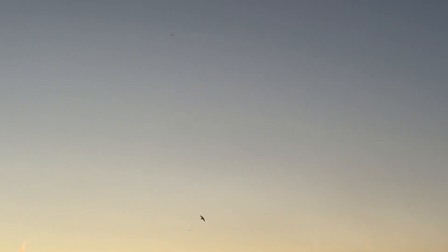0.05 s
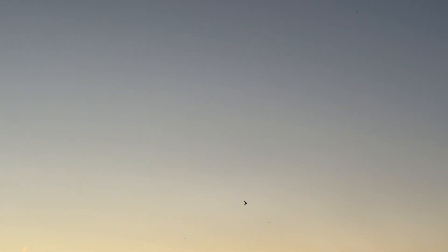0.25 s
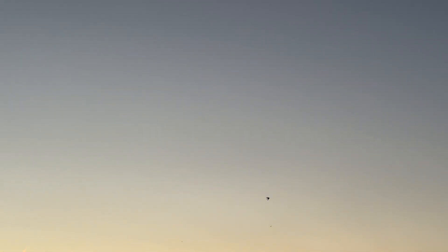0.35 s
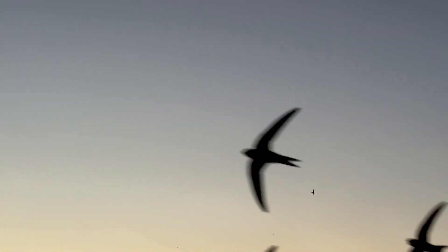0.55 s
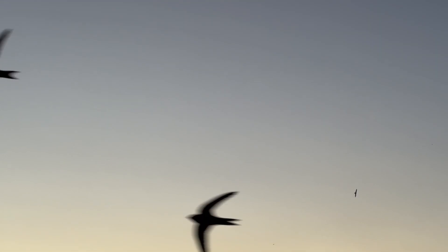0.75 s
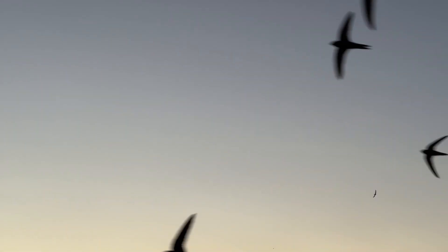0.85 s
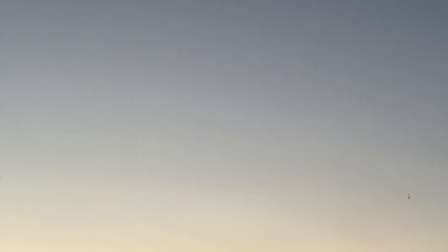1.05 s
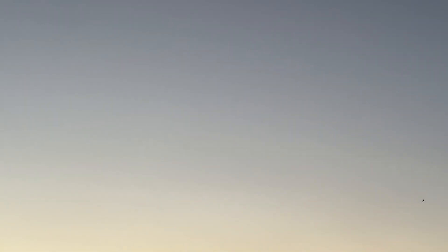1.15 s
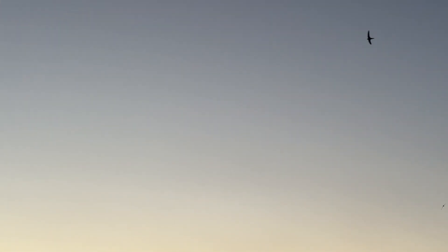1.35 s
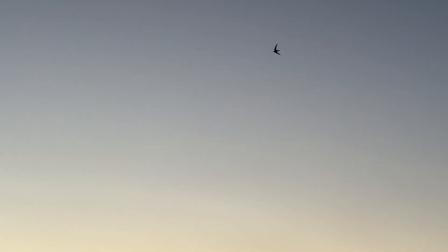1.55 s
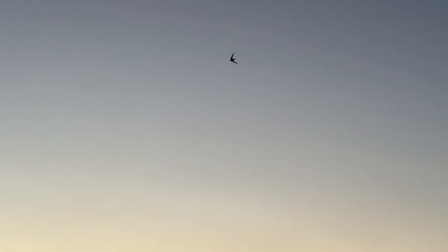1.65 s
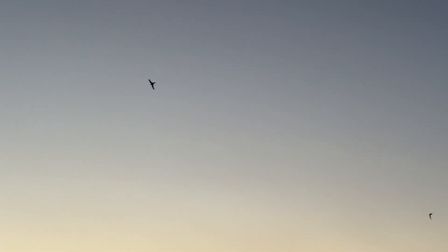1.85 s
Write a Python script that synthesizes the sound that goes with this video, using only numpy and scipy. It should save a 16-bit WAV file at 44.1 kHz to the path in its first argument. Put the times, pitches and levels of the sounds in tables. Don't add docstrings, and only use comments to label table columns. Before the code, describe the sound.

Swifts scream shrilly as a flock sweeps close overhead, then fades to thin distant calls

```python
import sys
import numpy as np
from scipy import signal
from scipy.fft import rfft, irfft
from scipy.io import wavfile

SR = 44100
rng = np.random.default_rng(int(sys.argv[2]) if len(sys.argv) > 2 else 0)


def store_wav(level_fs):
    pcm = np.round(np.clip(np.atleast_2d(level_fs), -1, 1) * 32767)
    wavfile.write(sys.argv[1], SR, pcm.T.astype(np.int16))


def boost(x):
    u = np.asarray(x, float) / 20
    return 10 ** u


N = 83790

# (multiple of the pitch, level [dB], hoarseness [0-1])
VOICE_PARTIALS = [(.5, -43, .5), (1, 0, .06), (1.5, -19, .45), (2, -15.5, .33), (2.5, -25, .5)]


def rms_one(x):
    return x / np.sqrt(np.mean(x ** 2) + 1e-20)


def drift(rate_hz, size):
    settle = 2000
    r = np.exp(-2 * np.pi * rate_hz / SR)
    gain = 2 * (1 - r) ** 1.5 / np.sqrt(r + 1)
    noise = rng.standard_normal(size + settle)
    return np.sqrt(2) * signal.lfilter([gain], [1, -2 * r, r * r], noise)[settle:]


def filtered(x, order, hz, kind="low"):
    return signal.sosfilt(signal.butter(order, hz, kind, fs=SR, output="sos"), x)


def add(out, start_s, sound):
    i = int(start_s * SR)
    a, b = max(i, 0), min(i + len(sound), N)
    if b > a:
        out[a:b] += sound[a - i:b - i]


def voice(hz, db, partials, buzz=0):
    breath_db, buzz_breath_db, breath_low_hz = -39, 11, 6800
    hoarse_hz, buzz_hoarseness = 550, 1.3
    n = len(hz)
    phase = 2 * np.pi * np.cumsum(hz) / SR
    breath = filtered(rng.standard_normal(n), 2, breath_low_hz, "high")
    out = boost(breath_db + buzz_breath_db * buzz) * breath
    for multiple, partial_db, hoarse in partials:
        h = np.clip(hoarse * (1 + buzz_hoarseness * buzz), 0, 1)
        smear = 1 - h + h * drift(hoarse_hz, n)
        below_limit = multiple * hz < .45 * SR
        out = out + boost(partial_db) * smear * np.sin(multiple * phase) * below_limit
    return np.sqrt(2) * boost(db) * out


def scream(hz, db, buzz):
    buzz_hz, buzz_jitter, buzz_fall_hz = 268, .07, 1000
    wobble_hz, flutter_db, edge_s = 22, 1.8, .004
    n, buzz = len(hz), np.clip(buzz, 0, 1)
    cycle = np.cumsum(buzz_hz * (1 + buzz_jitter * drift(25, n)) / SR) % 1
    hz = hz + wobble_hz * drift(57.4, n) + buzz * buzz_fall_hz * (.5 - cycle)
    chop = 1 - buzz + buzz * 2.7 * np.sin(np.pi * cycle) ** 2
    t = np.arange(n) / SR
    edge = np.clip(np.minimum(t, t[-1] - t) / edge_s, 0, 1)
    return edge * chop * voice(hz, db + flutter_db * drift(44, n), VOICE_PARTIALS, buzz)


def swoop(length_s, first_hz, top_hz, db):
    fast_rise_s, slow_rise_s, fast_share = .015, .09, .62
    swell_db, release_s, late_buzz = 4.5, .03, .45
    t = np.arange(int(length_s * SR)) / SR
    left_to_rise = fast_share * np.exp(-t / fast_rise_s) + (1 - fast_share) * np.exp(-t / slow_rise_s)
    release = np.clip(1 - (length_s - t) / release_s, 0, 1)
    level = db - swell_db * left_to_rise - 15 * release
    return scream(top_hz - (top_hz - first_hz) * left_to_rise, level, late_buzz * t / length_s)


def chip(length_s, hz, fall_hz, db, partials):
    u = np.linspace(0, 1, int(length_s * SR))
    return np.sin(np.pi * u) ** 2 * voice(hz + fall_hz * (.5 - u), db, partials)


def screams():
    # (time [s], pitch [Hz], level [dB], buzz [0-1])
    leads = [
        [(.201, 4950, -42.5, 0.27), (.22, 6005, -30.5, 0.05), (.246, 6517, -26, 0.33), (.3, 6870, -23.5, 0.06),
         (.355, 7083, -25.5, 0.58), (.4, 7316, -26.5, 0.71), (.45, 6944, -21.5, 0.4), (.5, 6737, -24.5, 0),
         (.53, 6370, -32.5, 0.9)],
        [(.474, 4520, -42, 0), (.49, 4953, -49, 0.9), (.512, 5350, -29.5, 0), (.536, 6050, -18, 0.1),
         (.57, 6190, -19, 0), (.61, 6246, -20.5, 0.08), (.65, 6210, -25.5, 0), (.72, 6141, -23, 0.2),
         (.8, 6070, -26, 0)],
        [(.79, 6108, -30, 0.41), (.803, 6180, -20, 0.7), (.815, 6203, -27, 1), (.83, 6177, -26, 0.6),
         (.86, 6160, -21, 0.42), (.886, 6280, -27.5, 0.98), (.895, 5830, -68, 1)],
    ]
    # (time [s], pitch [Hz], level [dB], buzz [0-1])
    stragglers = [
        [(1.073, 4980, -68, 0.4), (1.082, 4925, -36.5, 0.2), (1.107, 5480, -39.5, 0.53), (1.14, 5847, -37, 0),
         (1.19, 5960, -41, 0), (1.25, 5906, -39.5, 0.1), (1.3, 6100, -46.5, 0), (1.345, 5705, -59, 0.2)],
        [(1.133, 4110, -45, 0.2), (1.147, 4390, -42, 0), (1.163, 5060, -34.5, 0.1), (1.183, 4860, -41, 0),
         (1.2, 5210, -39, 0), (1.25, 5430, -38, 0), (1.33, 5483, -50, 0.55), (1.42, 5304, -54.5, 0.16),
         (1.465, 5400, -46, 0.05)],
        [(1.638, 4510, -53, 0.1), (1.67, 4780, -50.5, 0.05), (1.7, 5210, -56, 0.3), (1.735, 5456, -46.5, 0.13),
         (1.79, 5620, -53, 0), (1.9, 5730, -58, 0.35)],
    ]
    # (start [s], length [s], first pitch [Hz], top pitch [Hz], level [dB])
    swoops = [(0.016, 0.17, 4580, 6300, -41), (0.084, 0.14, 5840, 6580, -34.5),
              (0.13, 0.14, 4660, 6600, -42), (0.219, 0.35, 4550, 6440, -30), (0.29, 0.238, 6450, 6900, -29),
              (0.14, 0.13, 6300, 6800, -37.5), (0.61, 0.037, 5170, 6100, -31),
              (0.567, 0.12, 5600, 6300, -19), (0.588, 0.16, 4400, 6200, -33.5),
              (0.64, 0.18, 5200, 5950, -29), (0.774, 0.094, 4800, 6250, -26),
              (0.834, 0.18, 4950, 5800, -34), (0.45, 0.028, 5300, 5750, -27),
              (1.027, 0.04, 5100, 5000, -45.5), (1.03, 0.08, 3940, 4700, -50.5),
              (1.566, 0.044, 4430, 5200, -52), (1.895, 0.022, 4520, 5200, -41),
              (1.35, 0.14, 5370, 5390, -54), (1.47, 0.11, 5350, 5310, -51.5),
              (1.34, 0.16, 5700, 6150, -53.5)]
    out = np.zeros(N)
    for track in leads + stragglers:
        s, *columns = np.transpose(track)
        t = np.arange(s[0], s[-1], 1 / SR)
        add(out, s[0], scream(*[np.interp(t, s, c) for c in columns]))
    for s, *shape in swoops:
        add(out, s, swoop(*shape))
    return out


def throbs():
    # (middle [s], length [s], pitch [Hz], level [dB])
    pulses = [(.562, .012, 6290, -18.5), (.64, .012, 6334, -16), (.664, .013, 6200, -13),
              (.684, .022, 6244, -16), (.7, 0.016, 6110, -14.5), (.713, 0.012, 6123, -15),
              (.725, .012, 6008, -22), (.745, .024, 6116, -16.5), (.762, .012, 6195, -18.5),
              (.771, 0.014, 6100, -19.5), (.783, .014, 6000, -17)]
    rise_hz = 100
    out = np.zeros(N)
    for s, length, hz, db in pulses:
        add(out, s - length / 2, chip(length, hz, -rise_hz, db, VOICE_PARTIALS))
    return out


def trills():
    # (start [s], gap [s], first pitch [Hz], drop per chip [Hz], first level [dB])
    rows = [
        (.01, .0262, 6500, 30, -37),
        (.411, .027, 6050, 40, -32),
        (.563, .0255, 6500, 20, -23),
        (.9055, .0288, 6130, 90, -19),
    ]
    # (multiple of the pitch, level [dB], hoarseness [0-1])
    trill_partials = [(1, 0, .05), (1.5, -15, .5), (2, -11, .3), (2.5, -22, .5)]
    fade_db, chip_s, rise_hz = 2.5, .01, 250
    out = np.zeros(N)
    for s, gap, hz, drop, db in rows:
        for k in range(5):
            note = chip(chip_s, hz - k * drop, -rise_hz, db - k * fade_db, trill_partials)
            add(out, s + k * gap - chip_s / 2, note)
    return out


def rasping_bird():
    # (start [s], pulses, middle pitch [Hz], level [dB])
    bursts = [
        (0.7324, 4, 4800, -29),
        (0.752, 1, 4720, -31),
        (0.7642, 1, 4950, -27.5),
        (0.774, 1, 4760, -31),
        (0.7847, 4, 4740, -30),
        (0.831, 5, 4626, -31.5),
        (0.856, 1, 4500, -37),
        (0.864, 1, 4360, -36),
        (0.888, 1, 4570, -37),
        (.896, 1, 4170, -35.5),
    ]
    # (middle [s], middle pitch [Hz], fall
    # [Hz], level [dB])
    single_chips = [(.65, 5300, 600, -29), (.666, 4620, 200, -39), (.692, 5200, 600, -36),
                    (.722, 3950, 300, -40), (.905, 4300, 1500, -38), (.915, 4430, 400, -32),
                    (.924, 4400, 1300, -32), (.943, 3700, 300, -39), (.95, 4400, 1400, -31),
                    (.977, 4350, 1500, -32), (1.005, 3750, 300, -41), (.527, 5850, -300, -26),
                    (.552, 5500, -500, -30), (1.046, 5450, 200, -38), (1.073, 5100, 300, -41)]
    gap_s, pulse_s, fall_hz = .0042, .0032, 1500
    reedy = [(1, -4, 0.14), (1.6, -11, .5), (2, -3, 0.25)]  # multiple, dB, hoarseness
    thin = [(1, -1, 0.2), (2, -12, 0.7)]
    out = np.zeros(N)
    for s, pulses, hz, db in bursts:
        for k in range(int(round(pulses))):
            add(out, s + k * gap_s - pulse_s / 2, chip(pulse_s * 1.045, hz, fall_hz, db + 6.5, reedy))
    for s, hz, fall, db in single_chips:
        add(out, s - .004, chip(0.0075, hz, fall, db, thin))
    return out


def whistling_bird():
    # (start [s], length [s], first pitch [Hz], last pitch [Hz], level [dB])
    whistles = [(.05, .3, 3220, 3330, -61), (.03, .2, 2850, 2900, -66), (.18, .16, 3150, 3200, -62),
                (.5, .16, 2780, 2790, -54), (.506, .077, 3050, 3550, -53), (.57, .08, 3500, 3450, -58),
                (.68, .06, 2900, 3000, -57), (1.262, .084, 2280, 2077, -56), (1.495, .043, 2120, 1920, -62),
                (1.807, .02, 4150, 4050, -62), (1.59, .02, 3650, 3600, -65)]
    out = np.zeros(N)
    for s, length, first, last, db in whistles:
        add(out, s, chip(length, (first + last) / 2, first - last, db, [(1, 0, 0.24)]))
    return out


def wings():
    # (time [s], level [dB])
    rush = [
        (0, -70.5),
        (.4, -81),
        (.55, -55),
        (.8, -56.5),
        (.95, -61),
        (1.101, -66.5),
        (1.35, -71.5),
        (1.9, -74.5),
    ]
    s, db = np.transpose(rush)
    air = filtered(rng.standard_normal(N), 1, [1500, 4500], "band")
    flutter_db = 0.9 * drift(28, N)
    return boost(np.interp(np.arange(N) / SR, s, db) + flutter_db) * rms_one(air)


def far_birds():
    per_s, base_db, low_hz, high_hz, sag_hz_per_s = 30, -62, 5800, 6900, 250
    out = np.zeros(N)
    for k, (when, pitch, length, loudness) in enumerate(rng.random((66, 4))):
        top_hz = low_hz + (high_hz - low_hz) * pitch - sag_hz_per_s * k / per_s
        call = swoop(0.083 + 0.13 * length, .9 * top_hz, top_hz, base_db + 6 * loudness)
        add(out, (k + when) / per_s - .3, call)
    return filtered(out, 3, 7000)


def walls(x):
    near_t60_s, late_t60_s, late_db, delay_s = .25, 2.28, -23.5, .008
    t = np.arange(SR) / SR
    decay = boost(-60 * t / near_t60_s) + boost(late_db - 60 * t / late_t60_s)
    tail = rng.standard_normal(SR) * decay * (t > delay_s)
    tail = filtered(tail, 1, [3000, 9000], "band")
    return signal.fftconvolve(x, tail / np.sqrt(np.sum(tail ** 2)))[:N]


def town():
    # (frequency [Hz], level [dB])
    hum_spectrum = [(30, -22), (40, 7.5), (55, -3), (252, 0), (438, -6.5), (1100, -2), (2040, -15.5),
                    (2500, -31), (4000, -58), (5200, -39), (8800, -120)]
    hum_db, hiss_db, hiss_cut_hz = -54.5, -80, 12600
    hz = np.maximum(np.fft.rfftfreq(N, 1 / SR), 1)
    at, db = np.transpose(hum_spectrum)
    shape_db = np.interp(np.log(hz), np.log(at), db)
    shape_db = shape_db - 30 * np.clip(np.log2(at[0] / hz), 0, 3) - 12 * np.clip(np.log2(hz / at[-1]), 0, 3)
    hum = rms_one(irfft(boost(shape_db) * rfft(rng.standard_normal(N)), N))
    hiss = filtered(rng.standard_normal(N), 12, hiss_cut_hz)
    return boost(hum_db) * hum + boost(hiss_db) * hiss


def scene():
    echo_db, far_direct_db = -14, -8
    gone_s, gone_fade_s, gone_cut_hz = 0.91, 0.12, 12200
    near = screams() + throbs() + trills() + rasping_bird() + whistling_bird()
    far = far_birds()
    echoes = walls(boost(echo_db) * near + far)
    heard = near + boost(far_direct_db) * far + echoes + wings() + town()
    gone = np.clip((np.arange(N) / SR - gone_s) / gone_fade_s, 0, 1)
    dull = signal.sosfiltfilt(signal.butter(16, gone_cut_hz, fs=SR, output="sos"), heard)
    return ((1 - gone) * heard + gone * dull)[None]


def top_cut(x):
    return signal.sosfilt(signal.butter(12, 15950, fs=SR, output="sos"), x)


def record(dry):
    mix = filtered(dry, 8, 43, "high")
    mix = signal.sosfilt(signal.cheby2(12, 70, 16150, fs=SR, output="sos"), mix)
    return top_cut(mix)


dry = scene()
out = record(dry)
store_wav(out)
```